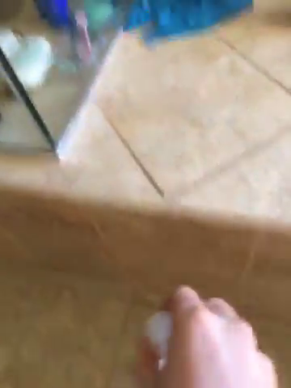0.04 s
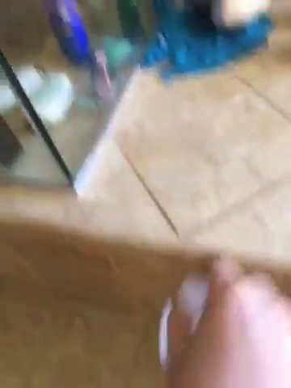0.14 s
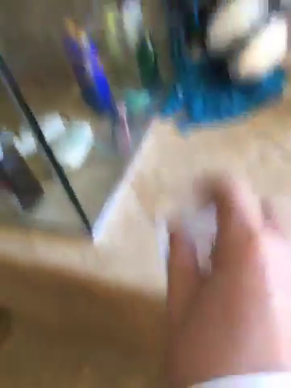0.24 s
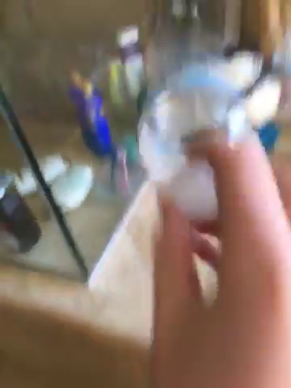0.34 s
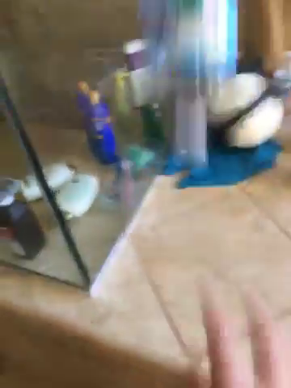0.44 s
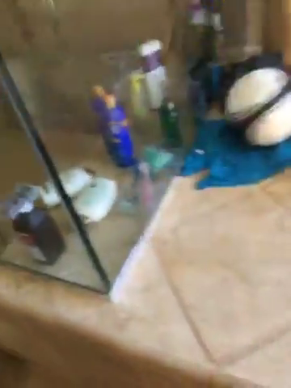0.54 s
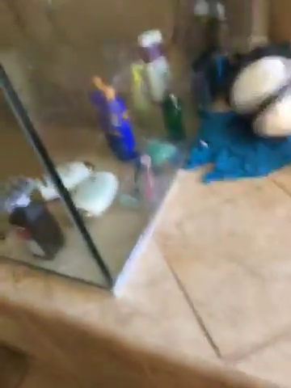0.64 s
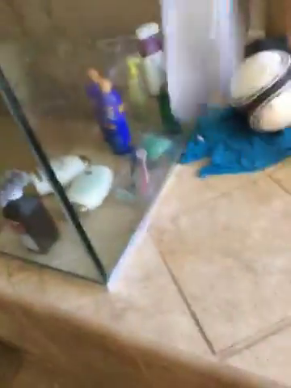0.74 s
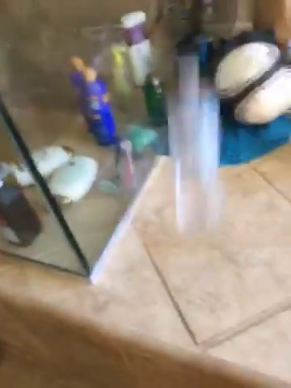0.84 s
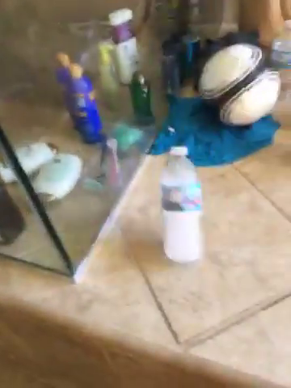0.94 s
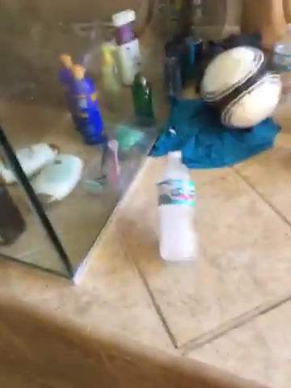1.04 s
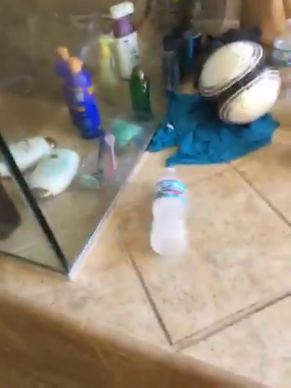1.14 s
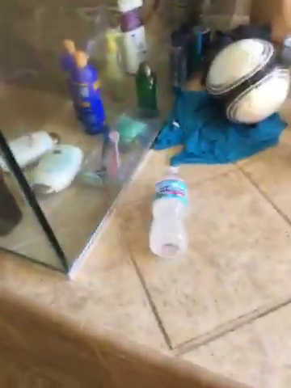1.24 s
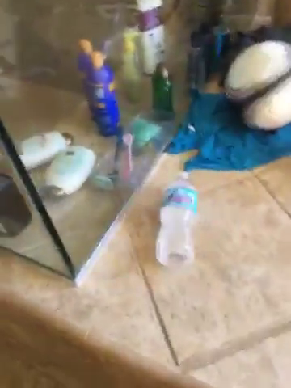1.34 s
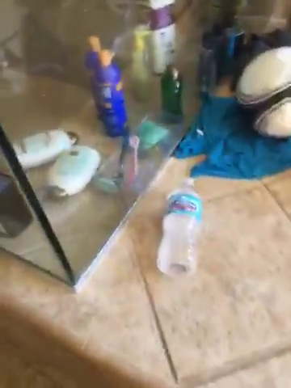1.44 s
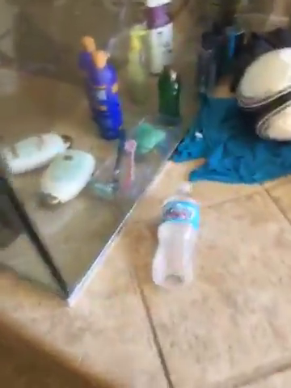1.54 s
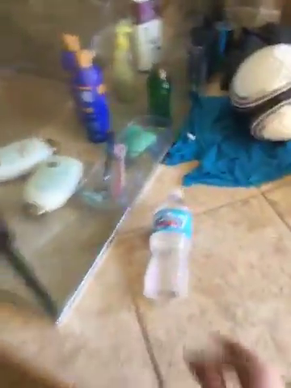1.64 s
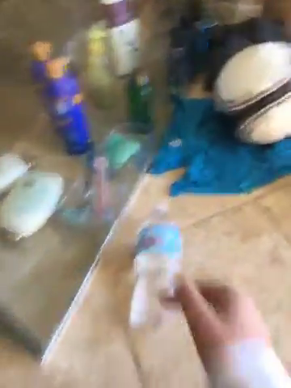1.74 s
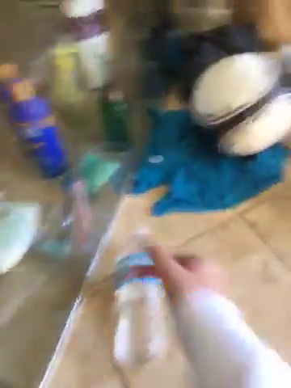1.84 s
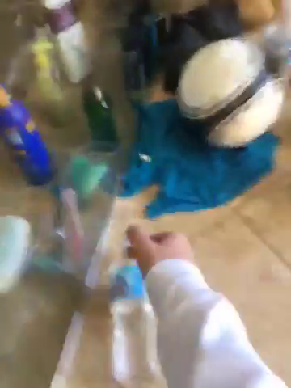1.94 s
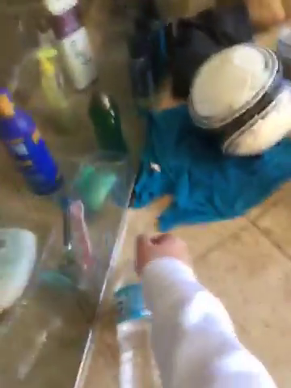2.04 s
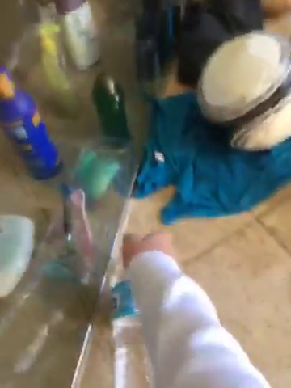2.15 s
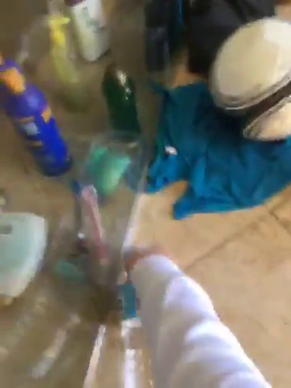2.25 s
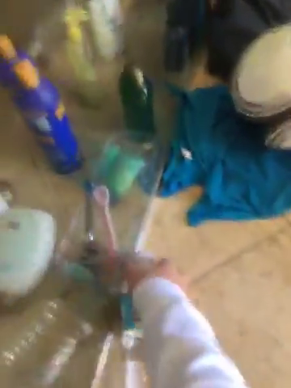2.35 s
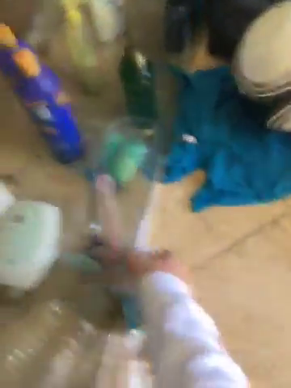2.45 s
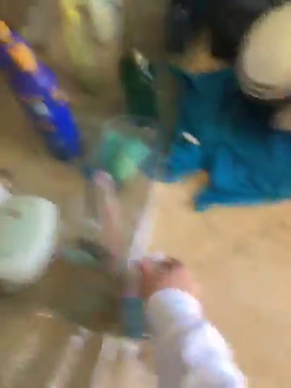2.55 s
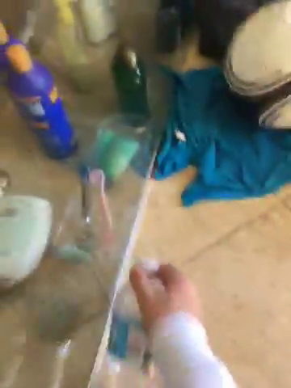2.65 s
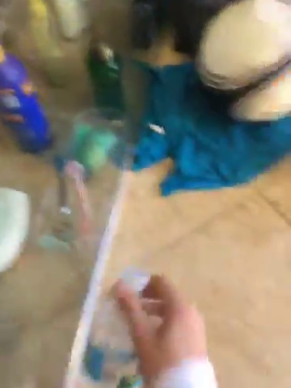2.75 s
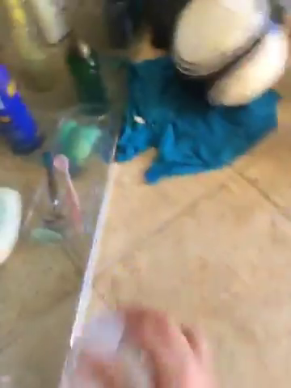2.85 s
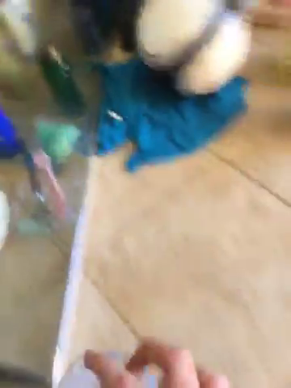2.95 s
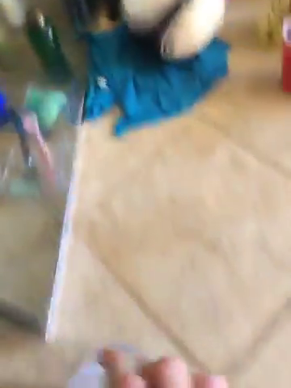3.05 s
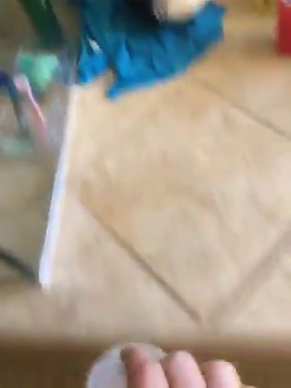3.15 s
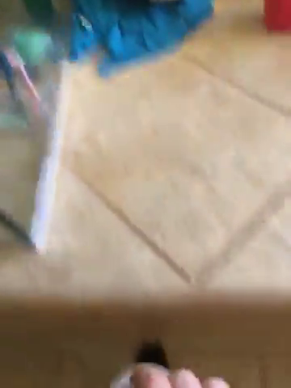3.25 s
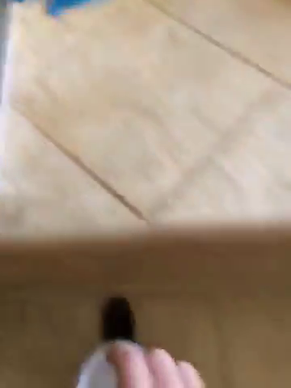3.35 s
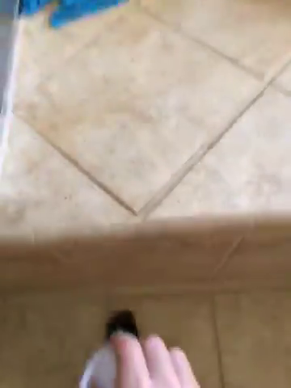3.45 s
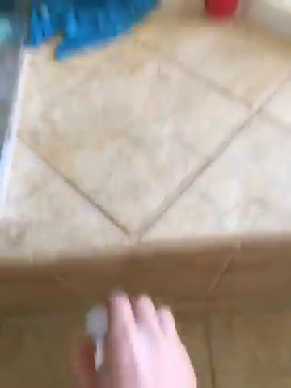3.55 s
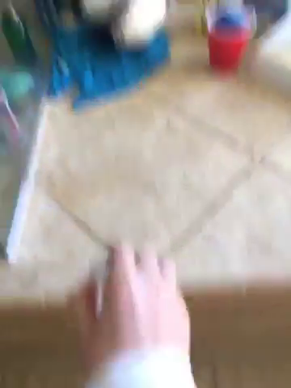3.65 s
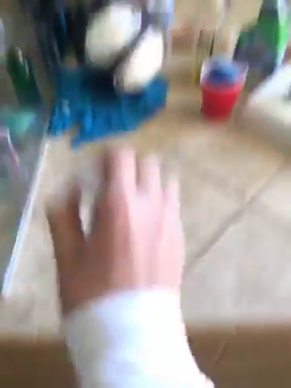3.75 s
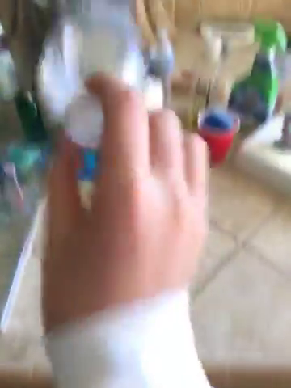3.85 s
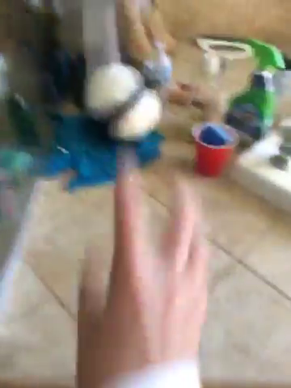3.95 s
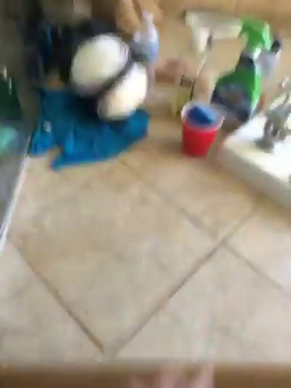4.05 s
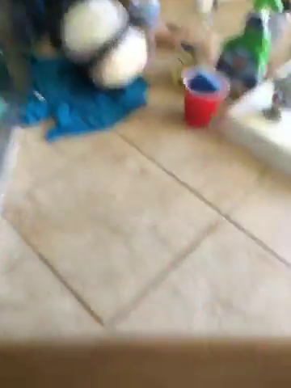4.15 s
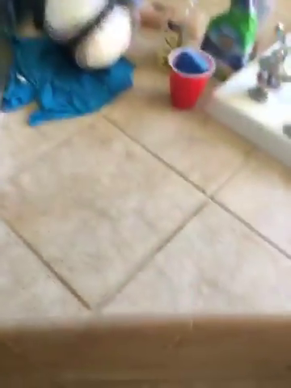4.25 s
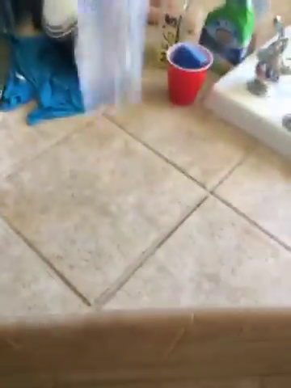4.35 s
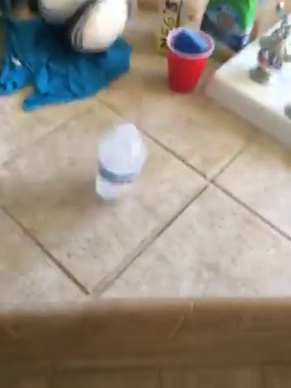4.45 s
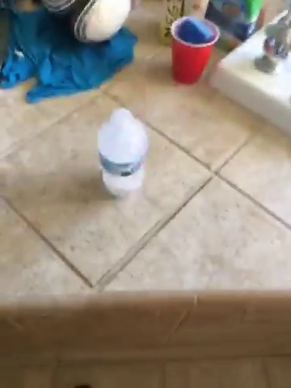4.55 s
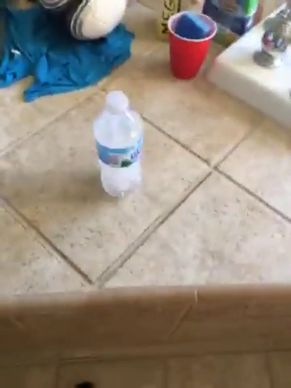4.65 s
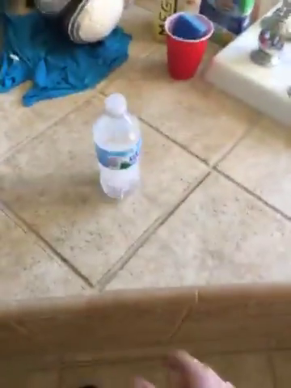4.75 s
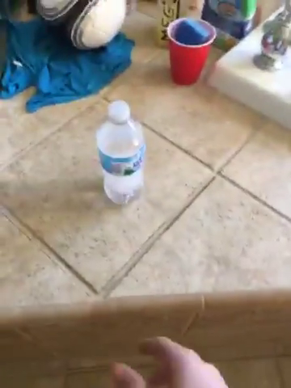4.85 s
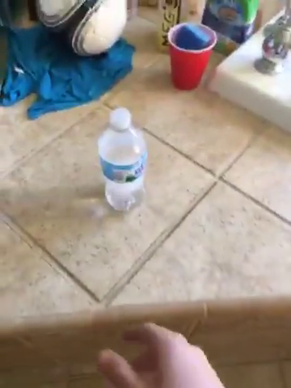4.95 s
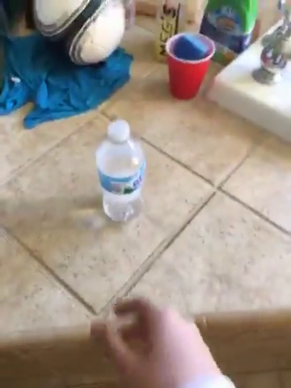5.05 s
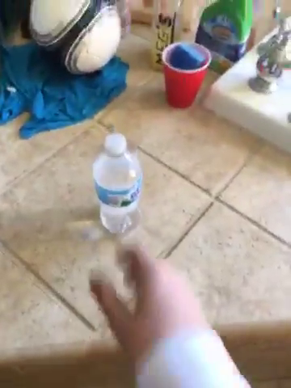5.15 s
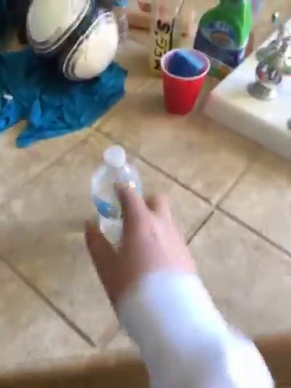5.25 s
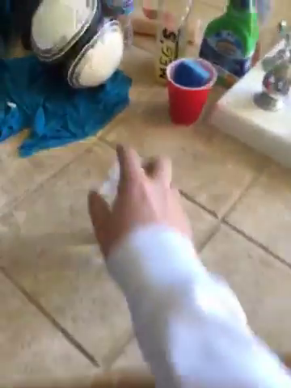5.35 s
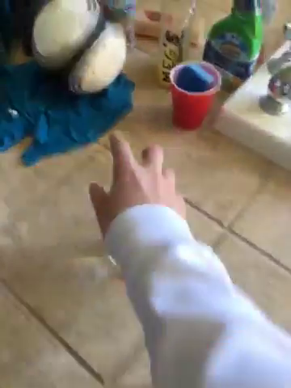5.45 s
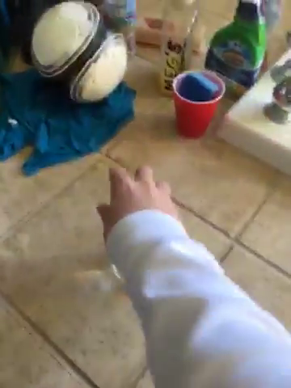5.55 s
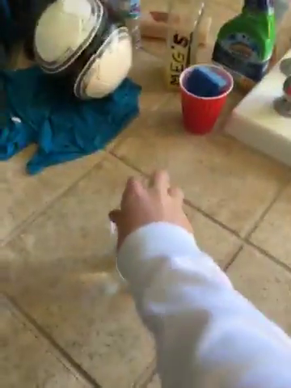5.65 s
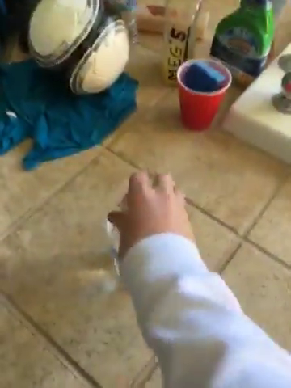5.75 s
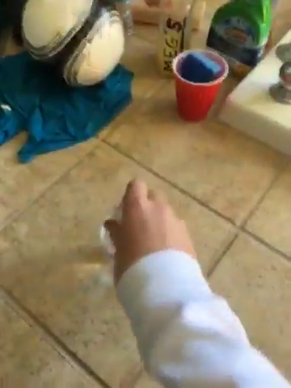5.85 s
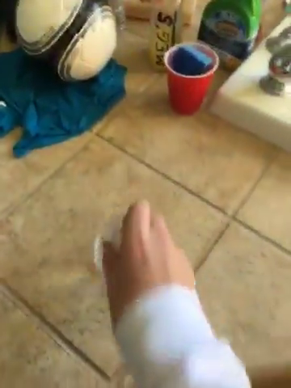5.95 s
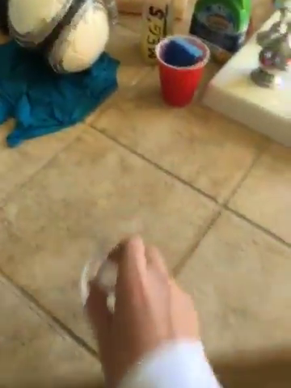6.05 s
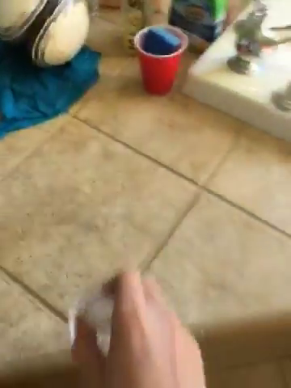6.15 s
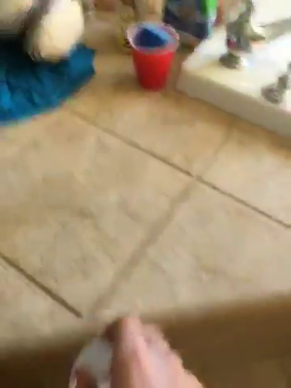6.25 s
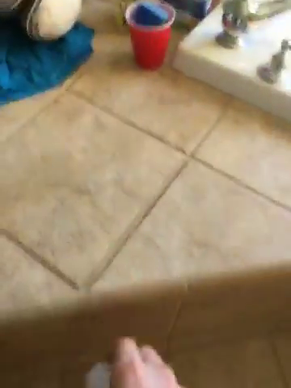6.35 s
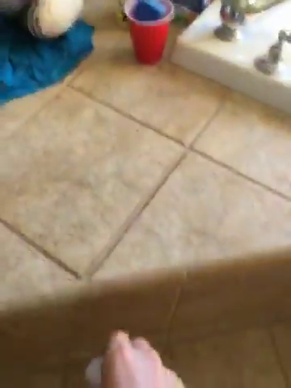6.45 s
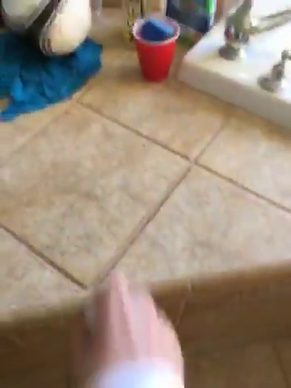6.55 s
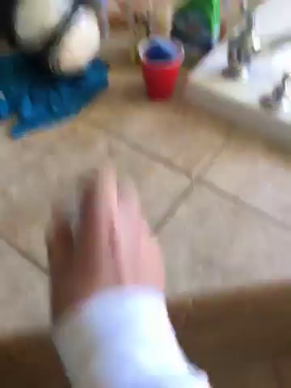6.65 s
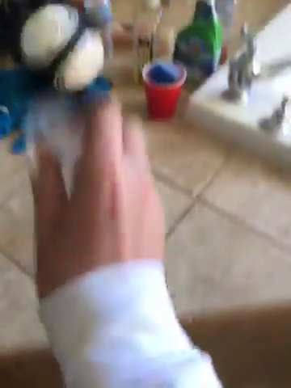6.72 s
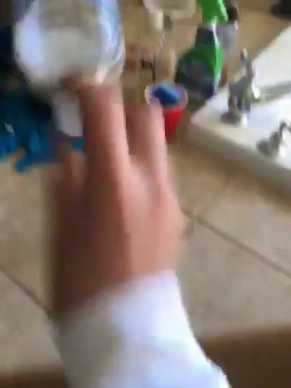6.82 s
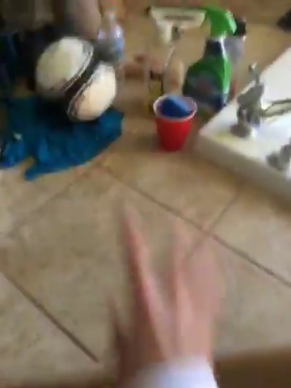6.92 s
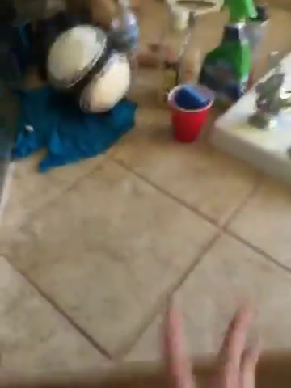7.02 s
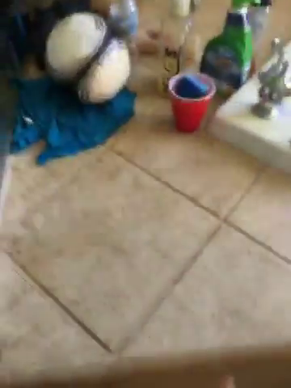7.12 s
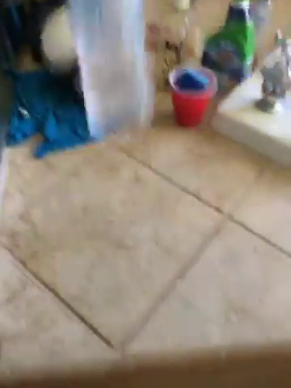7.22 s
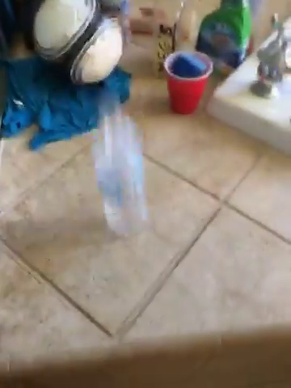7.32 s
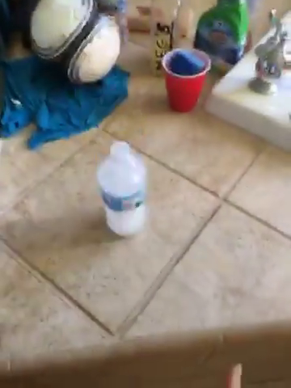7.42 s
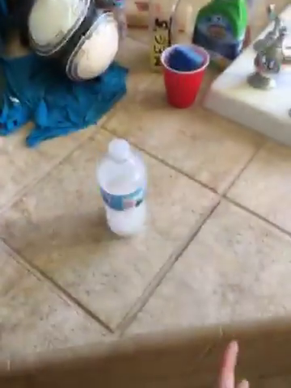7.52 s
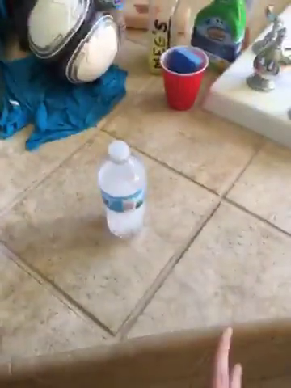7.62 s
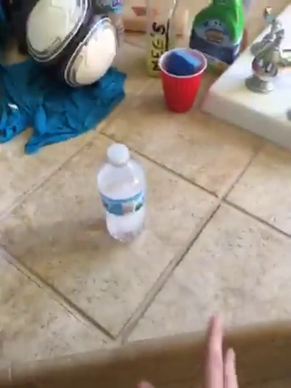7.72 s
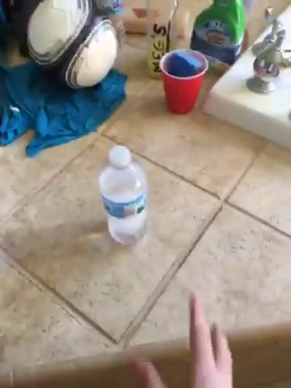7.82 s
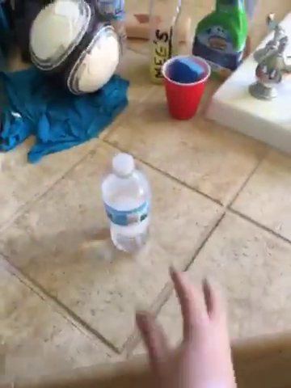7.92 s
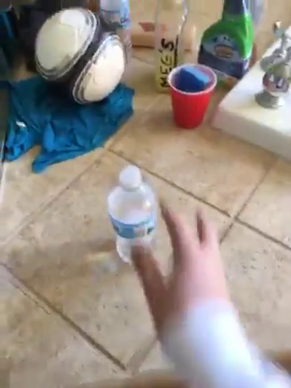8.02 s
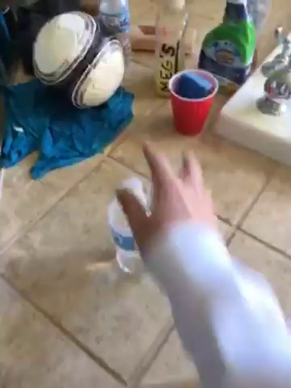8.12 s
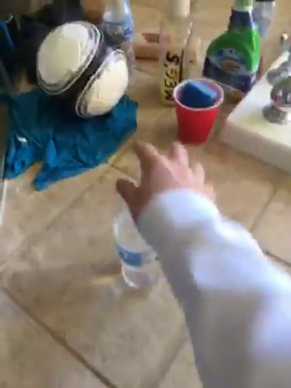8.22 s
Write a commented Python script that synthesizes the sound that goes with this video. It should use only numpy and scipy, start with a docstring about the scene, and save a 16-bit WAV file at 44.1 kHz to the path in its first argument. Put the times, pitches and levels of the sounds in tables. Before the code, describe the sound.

In a hard tiled bathroom, over a very faint low hum and rumble, a hand crinkles a thin, part-filled plastic bottle at about 0.4-0.8 s with a sleeve rustle and low bumps. At 1.0 s it lands on the tile with a sharp crack and hollow low drumming, leaving a short wash of echo, lingering rings and faint treble hiss; small, lighter bounces tick around 1.2 s. The sleeve rustles, and from 2.3 to 3.1 s the plastic is gripped with scuffs and crackles, one snap at 2.65 s much louder, and water slops. Light crinkles and a low bump at 4.0-4.3 s precede a second, strong, single thunk at 4.55 s. Soft handling and bumps come at 5.5-5.8 s, then quiet. Crackles at 6.9-7.2 s lead into a faint, fuzzy airy whistle, and the third loud, resonant landing hits at 7.43 s, its echo fading into slight rustling until the end near 8.3 s.

```python
"""A hand crinkles a part-filled plastic bottle (snaps of noise with short rings), a sleeve rustles (grainy
noise) and low bumps sound over a faint hum. The first throw lands at 1 s with small bounces on a tiled ledge
in a hard bathroom; cracking noise and a drumming tone leave a wash, lingering rings and a treble hiss. Handling
and water slops (resonant noise) lead to a second landing at 4.5 s and, after an airy whistle, a third at 7.4 s."""
import sys
import numpy as np
from scipy import signal
from scipy.fft import rfft, irfft
from scipy.io import wavfile
from scipy.ndimage import uniform_filter1d

SR = 44100
rng = np.random.default_rng(int(sys.argv[2]) if len(sys.argv) > 2 else 0)


def master(y):
    """Save y as 16-bit WAV."""
    cut = np.clip(np.atleast_2d(y).T, -1, 1)
    pcm = np.round(cut * 32767)  # scale
    wavfile.write(sys.argv[1], SR, pcm.astype(np.int16))


N = 365101  # length in samples

# sleeve and stirred air: (t/s, level/dB, brightness/dB per frequency range)
SLEEVE = [(0, -79, -2), (.43, -70.5, -1.5), (.75, -82.5, -5.5), (0.949, -76.5, 0.5), (1.5, -69.5, -0.5),
          (1.661, -67, 3), (1.78, -72, 2.5), (2.17, -67.5, 0.5), (2.53, -61.5, -1.5), (2.65, -72, -6),
          (3.18, -73.5, -3.5), (3.28, -74.5, -2.5), (3.55, -69.5, 6), (3.749, -77, 0.), (4.15, -81, -1.5),
          (4.31, -76.5, -1.5), (4.5, -76.5, -1.5), (5.13, -74, -1), (5.25, -70.5, 3.5), (5.549, -77.5, 0.5),
          (5.81, -68.5, -0.5), (6.05, -80, -2.5), (6.62, -80.5, 0.), (6.9, -76, 0.), (7.04, -81.5, -2.),
          (7.19, -87, -1), (7.4, -69.5, -4), (8.28, -77.5, 2)]
# decay of the tiled room by frequency: (f/Hz, t60/s)
TILE_DECAY = [(60, 0.22), (160, 0.79), (420, 0.6), (1100, 0.67), (2200, 0.6), (3800, 0.46), (5500, 0.53),
              (9000, 0.6), (15000, 0.13)]
LEAD_S = 0.02  # each landing starts this long before its blow


def amp(db):
    """Turn decibels into a linear factor."""
    return 10 ** (np.asarray(db) / 20)


def evened(x):
    """Scale to an rms of 1."""
    return x / np.sqrt(np.mean(x ** 2) + 1e-20)


def read(points, hz):
    """Read a curve between its points on a logarithmic frequency axis."""
    f, value = np.transpose(points)
    return np.interp(np.log(hz + 1), np.log(f + 1), value)


def add(mix, s, sound):
    """Lay a sound into the mix at s seconds, cut at the end."""
    part = mix[round(s * SR):][:len(sound)]
    part += sound[:len(part)]


def resonate(x, hz, width):
    """Two-pole resonance of about gain 1 at its centre."""
    pole = np.exp((2j * np.pi * hz - np.pi * width) / SR)
    return 2 * signal.lfilter([1 - abs(pole)], [1, -pole], x).real


def resonate_twice(x, hz, width):
    """Two equal resonances in a row, for steeper skirts."""
    return resonate(resonate(x, hz, width), hz, width)


def band(x, lo_hz, hi_hz):
    """Band-pass, then scale to an rms of 1."""
    sos = signal.butter(2, [lo_hz, hi_hz], "band", fs=SR, output="sos")
    return evened(signal.sosfilt(sos, x))


def coloured(count, points, tilt_db=0.):
    """Noise of rms 1 with the given spectrum, tilted in dB per octave about 2 kHz."""
    hz = np.fft.rfftfreq(count, 1 / SR)
    spectrum = rfft(rng.standard_normal(count))
    gain_db = read(points, hz) + tilt_db * np.log2((hz + 50) / 2000)
    return evened(irfft(spectrum * amp(gain_db), count))


def smooth_noise(count, window):
    """Slow random wander of rms 1, averaged over a window in samples."""
    return evened(uniform_filter1d(rng.standard_normal(count), window))


def room(x):
    """Tiled room: dense random reflections, each frequency dying at its own speed."""
    taps = np.zeros(SR)
    at = np.arange(300, SR - 10, 10) + rng.integers(0, 10, (SR - 301) // 10)
    taps[at] = rng.choice([-1., 1.], len(at))
    hz, frames, z = signal.stft(taps, SR, nperseg=256)
    decay = amp(-60 * frames / read(TILE_DECAY, hz)[:, None])
    tail = signal.istft(z * decay, SR, nperseg=256)[1]
    return signal.fftconvolve(x, tail / np.linalg.norm(tail))[:N]


def background():
    """Steady low noise, mains hum of slightly uneven level and a wandering building rumble."""
    # spectrum of the steady noise: (f/Hz, relative level/dB)
    floor_colour = [(12, -49.5), (20, -25), (70, 3), (93, -10.5), (127, -3), (193, -18), (270, -10),
                    (367, -28), (459, -25), (499, -40.5), (590, -38), (873, -43), (16000, -44.5)]
    # course of the rumble: (t/s, level/dB)
    rumble_level = [(0, -75), (.46, -61), (.9, -68), (1.55, -63), (2.03, -60), (2.28, -65), (2.6, -56),
                    (2.83, -61.5), (3.36, -63.5), (3.65, -66.5), (4.2, -61.5), (5.16, -66), (5.5, -70.5),
                    (6.32, -69), (6.6, -73), (7.17, -64.5), (8.28, -66.5)]
    floor_db, hum_db, hum_hz = -66, -66, 120
    t = np.arange(N) / SR
    floor = amp(floor_db) * coloured(count=N, points=floor_colour)
    hum = amp(hum_db + 0.83 * smooth_noise(N, 3000)) * np.sin(2 * np.pi * hum_hz * t)
    noise = rng.standard_normal(N)
    rumble = evened(resonate_twice(noise, 70, 22) + .7 * resonate_twice(noise, 46, 18))
    return floor + hum + amp(np.interp(t, *np.transpose(rumble_level))) * rumble


def rustle():
    """Cloth friction: grainy noise in four ranges; level and brightness follow the arm."""
    # balance of bass, low, middle and treble: (level/dB), one entry per range
    range_levels = (0.5, -4.5, 0.05, -3)
    edges_hz = (135, 450, 1500, 5000, 16500)
    grain = amp(1.71 * smooth_noise(N, 150))
    s, level_db, tilt_db = np.transpose(SLEEVE)
    t = np.arange(N) / SR
    out = np.zeros(N)
    for k, range_db in enumerate(range_levels):
        noise = band(grain * rng.standard_normal(N), edges_hz[k], edges_hz[k + 1])
        course_db = np.interp(t, s, level_db + range_db + (k - 2) * tilt_db)
        out += amp(course_db) * noise
    return out


def bumps():
    """Low damped tones from hand, feet and ledge; the higher ones are rough with noise."""
    # soft bumps: (t/s, level/dB, f/Hz, t60/s)
    soft_bumps = [(0.444, -51, 275, 0.46), (0.486, -40.5, 236, 0.051), (0.661, -49, 122, 0.31),
                  (1.871, -45.5, 51.1, 0.093), (2.129, -53, 159, 0.2), (2.414, -47, 122, 0.38),
                  (2.447, -47.5, 88.5, 0.2), (2.556, -45, 340, 0.1), (2.66, -58, 66, 0.11),
                  (4.178, -43.5, 103.6, 0.84), (5.611, -47.5, 186, 0.16), (5.661, -45, 179.6, 0.082),
                  (5.698, -58, 275, 0.63), (5.778, -51.5, 122, 0.22), (5.821, -46.5, 117, 0.12),
                  (6.871, -54.5, 266, 0.13), (6.911, -46.5, 202.4, 0.092), (6.932, -47, 283, 0.1),
                  (7.145, -48.5, 104, 0.12)]
    out, t = np.zeros(N), np.arange(SR // 2) / SR
    for s, db, hz, t60 in soft_bumps:
        rough = np.clip((hz - 120) / 100, 0, .9)
        fuzz = evened(resonate(rng.standard_normal(len(t)), hz, hz / 2))
        pure = np.sqrt(2) * np.sin(2 * np.pi * hz * t)
        tone = (1 - rough) * pure + rough * fuzz
        onset = 1 - np.exp(-t / 0.0019)
        add(out, s, amp(db - 60 * t / max(t60, .02)) * tone * onset)
    return out


def slops():
    """Slopping water rings the air in the bottle: resonant noise bursts, dying slowly. The faint burst at 4.0 s
    is instead the room ringing on after a snap."""
    # slops: (t/s, level/dB, f/Hz, width of each of two resonances/Hz, t60/s)
    water_slops = [(2.66, -59.5, 3600, 300, .5), (2.946, -54, 1050, 900, .27), (3.02, -48.5, 875, 585, .4),
                   (4.0, -65, 2070, 497, .32), (4.28, -61.5, 3425, 200, .4), (6.9, -68, 3350, 592, .51),
                   (6.93, -67.5, 1730, 708, .46), (7.234, -58, 4460, 1770, .15)]
    rise_s = 0.0027
    out, t = np.zeros(N), np.arange(SR) / SR
    for s, db, hz, width, t60 in water_slops:
        ring = evened(resonate_twice(rng.standard_normal(len(t)), hz, width))
        add(out, s, amp(db - 60 * t / t60) * (1 - np.exp(-t / rise_s)) * ring)
    return out


def scuffs():
    """Hand sliding on plastic: short strokes of grainy friction noise, with some room."""
    # strokes: (t/s, time until the fade has reached 1/e/s, level/dB, brightness/dB per octave)
    strokes = [(0.431, 0.056, -54.5, -4), (0.44, 0.05, -59, 14.), (0.657, 0.054, -61.5, -0.5),
               (2.403, 0.086, -52, -6.5), (2.497, 0.053, -49, -2.5), (2.544, 0.063, -45.5, -6.5),
               (2.651, 0.017, -41, -6), (2.837, 0.035, -52, -3.5), (2.944, 0.033, -49.5, -3.5),
               (3.034, 0.047, -54.5, -16), (3.95, 0.036, -64, -1), (3.981, 0.029, -55.5, -4.5),
               (4.171, 0.046, -52.5, -6), (4.21, 0.13, -62.5, -5.5), (4.282, 0.035, -61, 6),
               (6.886, 0.035, -60.5, -4.5), (6.892, 0.045, -59, 14.5), (6.931, 0.014, -49.5, -9),
               (7.137, 0.055, -55, -3), (7.15, 0.076, -62, -4.5)]
    friction_colour = [(150, -27.5), (300, 3.0), (16000, -1.0)]  # (f/Hz, relative level/dB)
    out = np.zeros(N)
    for s, length, db, tilt_db in strokes:
        grain = amp(4.5 * smooth_noise(8192, 40))
        noise = evened(grain * coloured(count=8192, points=friction_colour, tilt_db=tilt_db))
        part = np.arange(8192) / SR / length
        stroke = np.clip(part * 6, 0, 1) * np.exp(-part ** 4)
        add(out, s, amp(db) * noise * stroke)
    return out + amp(-13.0) * room(out)


def crinkles():
    """Each snap of the thin wall is a broad click with a short fuzzy ring; the click wakes the room most."""
    # placed crinkles: (t/s, ring level/dB, ring f/Hz, click level re ring/dB)
    wall_snaps = [(.4763, -46.5, 3340, -10), (.4864, -44, 2700, -8), (.6539, -41, 1400, 3.5),
                  (.7267, -54, 2565, -8.5), (.733, -53.5, 10500, -4), (.7532, -47, 3320, -14.5),
                  (.7744, -51, 4103, -11), (1.7794, -58, 3190, 0), (1.9839, -60, 2480, 6.5),
                  (2.3491, -41.5, 3000, -15), (2.3685, -46.5, 2870, 2.5), (2.3984, -53, 1770, -15),
                  (2.4184, -46, 1440, -3), (2.4977, -44.5, 2590, -2), (2.5556, -43.5, 1450, 4),
                  (2.6524, -27, 3420, -19), (2.7377, -48.5, 1320, -1.5), (2.7786, -55, 3400, 7),
                  (2.824, -55, 1870, 2), (2.8459, -51, 1520, -7), (2.8619, -44, 6100, -2),
                  (2.9434, -55, 1440, -19), (2.9572, -54, 1670, -15), (2.9966, -53, 6500, -15),
                  (3.033, -50, 1300, -14), (3.0436, -48, 2930, -10), (3.0555, -43.5, 3220, -2.5),
                  (3.0934, -46, 3660, -1.5), (3.1247, -53, 6200, -14), (3.9644, -50.5, 3200, -13),
                  (3.9968, -51, 2196, -1.5), (4.1774, -41.5, 1408, -7), (4.1829, -44, 2360, -7),
                  (4.2822, -46.5, 3368, -4), (4.3194, -49.5, 3262, -5.5), (4.601, -40.5, 3600, -5.5),
                  (4.759, -54.5, 4600, -3), (5.4615, -52, 3460, -9), (5.6111, -53, 3400, -1),
                  (5.6585, -49.5, 5700, -9.5), (5.6965, -51.5, 5670, -16), (5.708, -57, 3400, -3),
                  (5.8142, -48, 7000, -14), (5.819, -46, 3540, -6), (6.8718, -63.5, 5200, -3),
                  (6.9017, -56, 3400, -3), (6.9391, -48.5, 3220, -9), (7.0239, -59.5, 12500, -3),
                  (7.1337, -43, 2200, 3.5), (7.1482, -45, 3810, -4.5), (7.2444, -50, 4200, -9),
                  (7.3721, -54.5, 2220, -11), (7.614, -50, 4170, -14), (8.0491, -55.5, 3550, 6)]
    ring_t60 = .022  # s; the click takes 0.7 of it
    faint_per_s, faint_db, faint_click_db = 5, 13, -5  # strays: rate, most dB above the rustle, click re ring
    rings, clicks, t = np.zeros(N), np.zeros(N), np.arange(3000) / SR
    when, size, pitch = rng.random((int(faint_per_s * N / SR), 3)).T
    when = when * N / SR
    s, db, _ = np.transpose(SLEEVE)
    faint_level = np.interp(when, s, db) + faint_db * size
    faint = zip(when, faint_level, 2000 * 5 ** pitch, np.full(len(when), faint_click_db))
    for s, db, hz, click_db in [*wall_snaps, *faint]:
        a, b = rng.standard_normal((2, 3000))
        ring = evened(resonate(a, hz, 0.14 * hz))
        click = band(b, hz / 3.1, min(5.1 * hz, 16000))
        add(rings, s, amp(db - 60 * t / ring_t60) * ring)
        add(clicks, s, amp(db + click_db - 60 * t / (.7 * ring_t60)) * click)
    return rings + clicks + amp(-5) * room(clicks + 0.44 * rings)


def whistle():
    """Air whistles past the spinning bottle in the last flight: a fuzzy wavering tone."""
    start_s, end_s, rise_s = 7.19, 7.43, .05  # the fall takes as long as the rise
    db, hz, width_hz = -57, 1120, 150
    t = np.arange(N) / SR
    tone = evened(resonate_twice(rng.standard_normal(N), hz, width_hz))
    fade_in = np.clip((t - start_s) / rise_s, 0, 1)
    fade_out = np.clip((end_s - t) / rise_s, 0, 1)
    return amp(db) * tone * fade_in * fade_out


def echoes(echo_db, waves_db, air_db, tilt_db):
    """The tiles return a dense wash, the top dying fast; resonances linger under a faint treble hiss."""
    # colour of the wash: (f/Hz, relative level/dB)
    echo_colour = [(40, -46), (79, -17), (100, -6), (149, -3), (202, 1.5), (274, -11), (338, -10.5),
                   (458, -18.5), (803, -16), (1140, -18.5), (1500, -20.5), (2470, -24), (4200, -30),
                   (5500, -39.5), (9000, -44.5), (16000, -56.5)]
    # near reflections above the late wash: (f/Hz, level/dB)
    near_reflections = [(200, -7), (1000, -1.), (3000, 2.5), (8000, 11), (16000, 9.)]
    # low standing waves: (f/Hz, level/dB, t60 before the cap below/s)
    standing_waves = [(102, -9, 0.25), (111, -9, 0.15), (147, -13.5, 0.46), (166.3, 2, 1), (178, -13.5, .4),
                      (203, -3.5, 1), (181, -11, 0.58), (234, -9, .6), (249, -12.5, .5), (294, -7, .35),
                      (331.7, -7, 1), (368, -12.5, 0.4)]
    # lingering higher resonances: (f/Hz, level/dB, t60/s)
    lingering_rings = [(269, -5, 1.4), (421, -13, 0.12), (660, -2, 0.87), (796, -2.5, 0.86),
                       (838, -2.5, 0.37), (994, -2, 0.32), (1005, -8, 0.82), (1130, -5, 0.3),
                       (1260, -2.5, 0.23), (1547, -5.5, 0.34), (2013, -9, 0.47), (2230, -6.5, 0.28),
                       (2390, -9.5, .4), (2440, -9, 0.26), (3220, -16, .3)]
    longest_wave_t60, longer = .72, 1.212  # s; factor on the tile decay times
    rings_db, boom_db, boom_hz = -16, -7.5, 68  # rings re wash; the ledge's low boom re standing waves
    hiss_db, hiss_share, hiss_s = -63, .4, 0.58  # level at an echo of -21 dB, dB per echo dB, length
    t = np.arange(SR) / SR

    air = evened(resonate_twice(rng.standard_normal(SR), 1030, 600))  # air in the bottle: Hz, width Hz
    colour = coloured(count=SR, points=echo_colour, tilt_db=tilt_db) + amp(air_db) * air
    hz, frames, z = signal.stft(colour, SR, nperseg=256)
    early = amp(read(near_reflections, hz)[:, None] - 60 * frames / 0.3)
    late = amp(-60 * frames / longer / read(TILE_DECAY, hz)[:, None])
    wash = signal.istft(z * late * (1 + early), SR, nperseg=256)[1][:SR]

    waves = amp(boom_db - 60 * t / 0.47) * np.sin(2 * np.pi * boom_hz * t)
    for f, db, t60 in standing_waves:
        phase = rng.uniform(0, 2 * np.pi)
        waves += amp(db - 60 * t / min(t60, longest_wave_t60)) * np.sin(2 * np.pi * f * t + phase)

    a, b = rng.standard_normal((2, SR))
    rings = np.zeros(SR)
    for f, db, t60 in lingering_rings:
        rings += amp(db - 60 * t / t60) * evened(resonate(a, f, 4 + f / 70))

    uneven = amp(3 * smooth_noise(SR, 130))
    hiss_level = amp(hiss_db + hiss_share * (echo_db + 21) - 41 * t)
    hiss_end = np.exp(-(t / hiss_s) ** 6)  # it stops rather suddenly
    hiss = evened(uneven * band(b, 2500, 16500)) * hiss_level * hiss_end

    quick = 1 - np.exp(-t / 0.0018)
    slow = 1 - np.exp(-(t / 0.068) ** 2)  # the low waves swell in slowly after the blow
    bright = amp(echo_db) * wash + amp(echo_db + rings_db) * rings + hiss
    return bright * quick + amp(waves_db) * waves * slow


def landing(crack_db, thump_db, overtone, contact, tilt_db):
    """The base cracks on the tile and drums at full strength for some milliseconds, then drops steeply."""
    # spectrum of the crack: (f/Hz, relative level/dB)
    crack_colour = [(180, -32.5), (300, 7.5), (400, -9), (565, -8), (1280, -12), (3400, -22.5), (4160, -19),
                    (15200, -36.5), (16000, -40)]
    # modes of the bottle shell: (f/Hz, width/Hz, level/dB)
    shell_modes = [(865, 160, -1.5), (1317, 9.3, 8.5), (1666, 100, -0.5), (2000, 450, -3.5),
                   (3120, 290, -7.5), (3260, 130, -8.5), (4020, 36, -10.5), (5700, 720, -15),
                   (6340, 130, -18.5)]
    drum_hz, drum_lag_s = 170, .001
    second_s, second_share = .007, 0.4  # the far rim slaps down just after the first touch
    t = np.arange(4096) / SR - LEAD_S
    after = np.maximum(t, 0)
    held = 1 / (1 + np.exp(np.clip((t - contact) / 0.001, -50, 50)))  # full level, then a steep drop

    noise = coloured(count=4096, points=crack_colour, tilt_db=tilt_db)
    shell = evened(sum(amp(db) * resonate(noise, f, w) for f, w, db in shell_modes))
    second = second_share * (t > second_s) * np.exp(-abs(t - second_s) / .0015)
    touches = np.exp(-after / 0.0016) + second
    crack = noise * (0.78 * touches + 0.3 * np.exp(-after / 0.0055) * held)
    crack += .5 * shell * np.exp(-after / 0.033) * held
    crack *= 1 - np.exp(-after / 0.00041)

    drum = np.maximum(t - drum_lag_s, 0)
    turns = drum_hz * drum * (1 + 0.13 * np.exp(-drum / 0.018))  # the pitch sags as the base flattens
    tones = np.sin(2 * np.pi * turns) + overtone * np.sin(2 * np.pi * 322 * drum)
    thump = tones * (1 - np.exp(-drum / 0.0027)) * held
    # a low swing swells and fades round the blow
    low_swing = 0.41 * np.sin(2 * np.pi * 105 * t) * np.exp(-((t - .005) / 0.007) ** 2)
    return amp(crack_db) * crack + amp(thump_db) * np.sqrt(2) * (thump + low_swing)


def landings():
    """Every landing and bounce strikes the ledge and then sets off its own echoes."""
    # blows: (t/s, crack level/dB, thump level/dB, overtone share, time at full strength/s,
    # brightness/dB per octave, echo level/dB, low wave level/dB, bottle air in the echo/dB,
    # echo brightness/dB per octave)
    blows = [(.992, -12.5, -13, 0.47, 0.019, 3, -25, -28, -11.5, 0.4),
             (1.213, -18.5, -43, .1, 0.009, 4.5, -40, -70, -6, -1.3),
             (1.2192, -22, -32, .3, 0.0092, -6.7, -39.5, -46, -10.5, 1.5),
             (1.243, -23.5, -56, .1, 0.0029, 0.5, -45, -45, -6, 4),
             (4.548, -8.5, -7.5, .15, .0145, 1.86, -23, -24, -16, 0),
             (7.433, -11, -8.5, 0.52, 0.016, 3, -22.5, -21, -4.5, 1.03)]
    out = np.zeros(N)
    for s, crack_db, thump_db, overtone, contact, tilt_db, *echo in blows:
        add(out, s - LEAD_S, landing(crack_db, thump_db, overtone, contact, tilt_db))
        add(out, s + .004, echoes(*echo))
    return out


def scene():
    """Sum all layers into one channel."""
    surroundings = background() + rustle() + bumps()
    handling = slops() + scuffs() + crinkles() + whistle()
    return (surroundings + handling + landings())[None]


def record(dry):
    """Soft overload at the peaks, then a steep low-pass."""
    ceiling, edge_hz = .8, 15900
    soft = ceiling * np.tanh(dry / ceiling)
    lowpass = signal.firwin(511, edge_hz, window=("kaiser", 9), fs=SR)
    return signal.oaconvolve(soft, lowpass[None], "same")


dry = scene()
out = record(dry)
master(out)
```